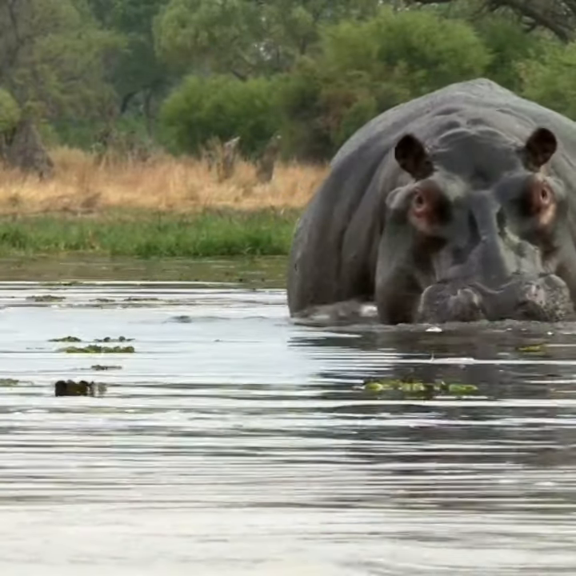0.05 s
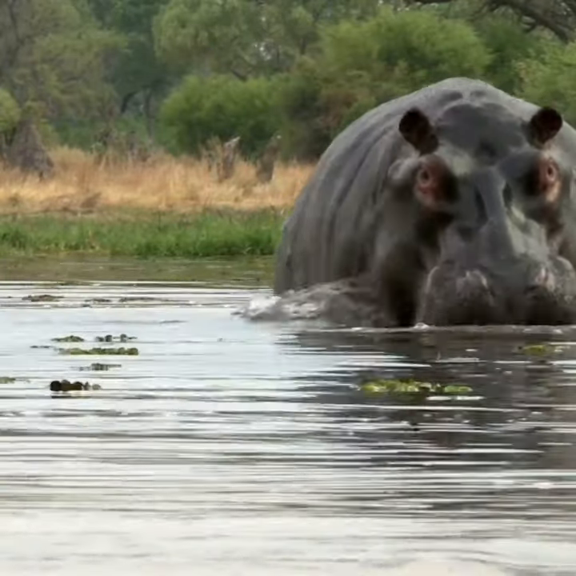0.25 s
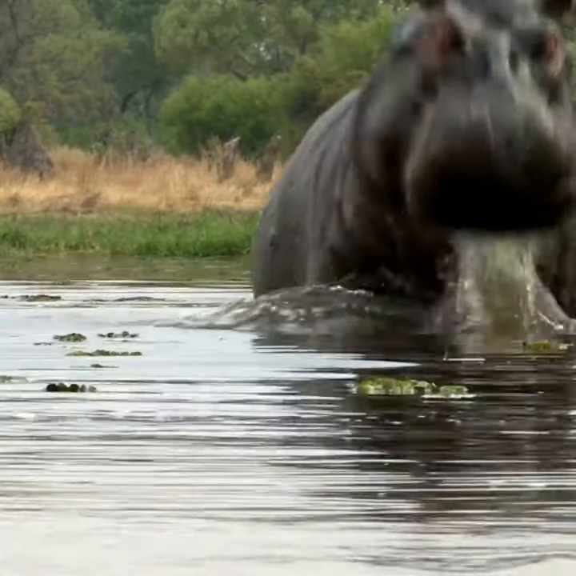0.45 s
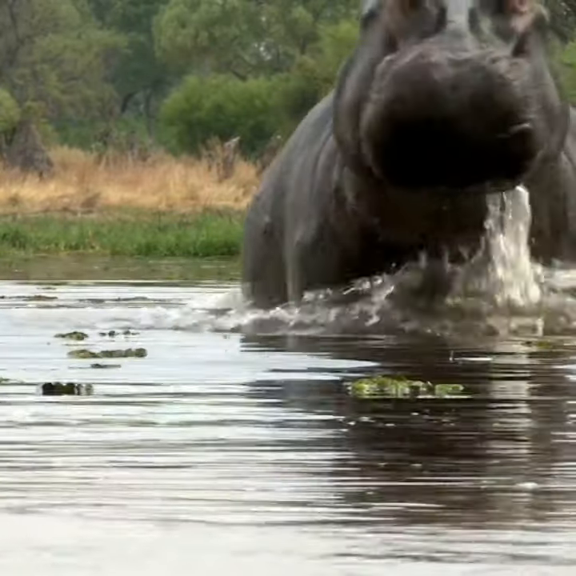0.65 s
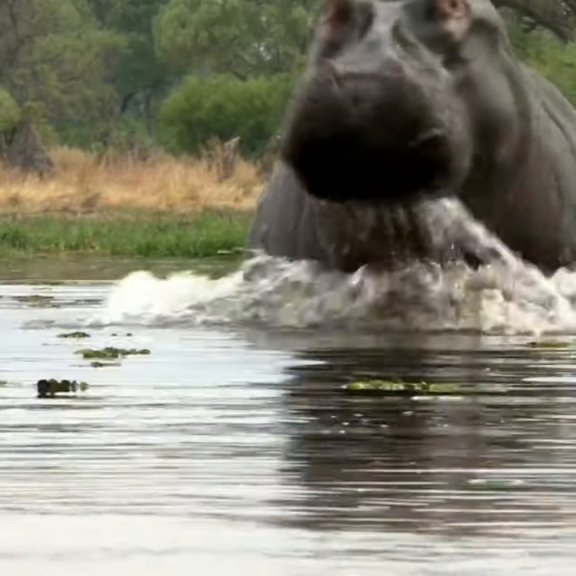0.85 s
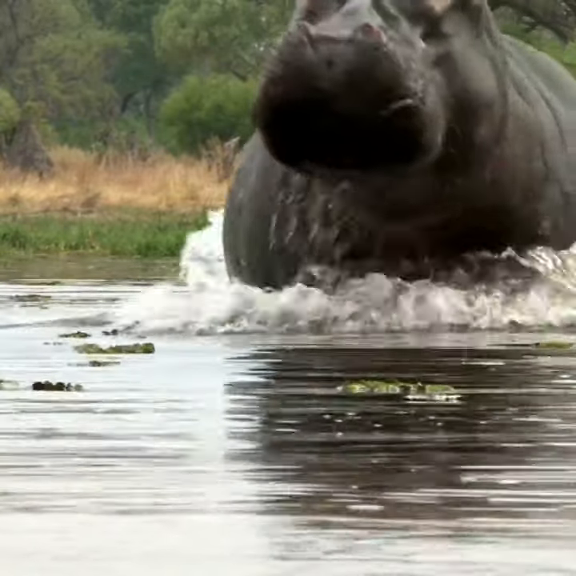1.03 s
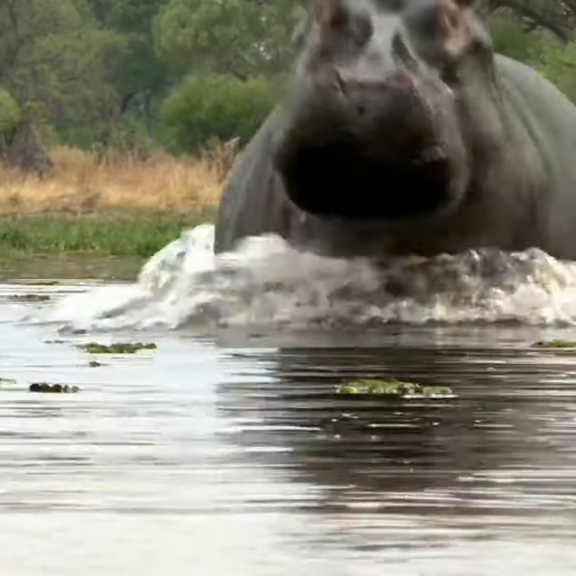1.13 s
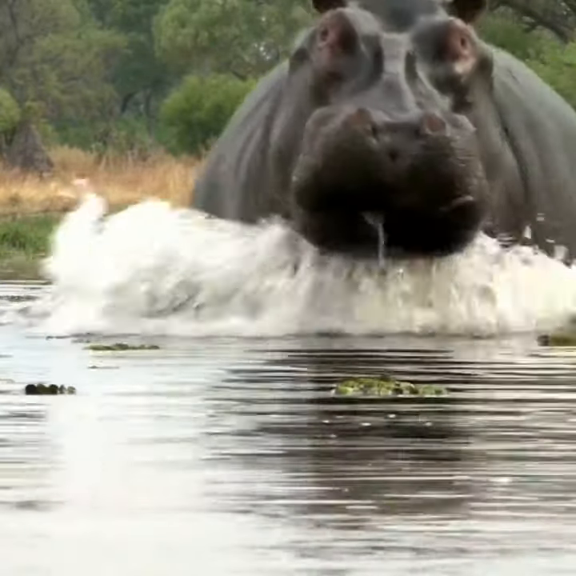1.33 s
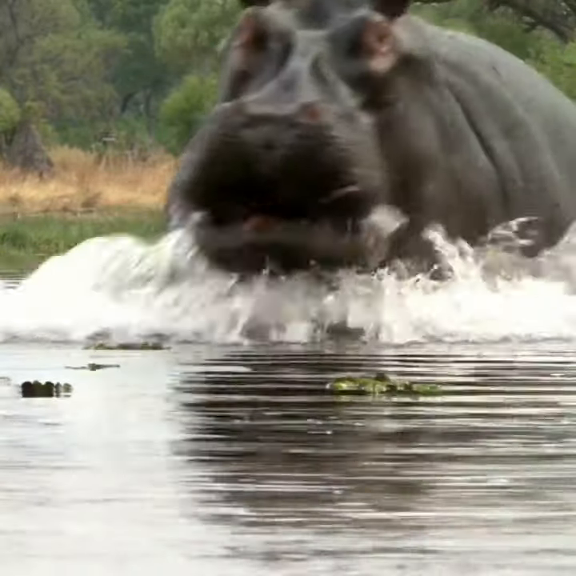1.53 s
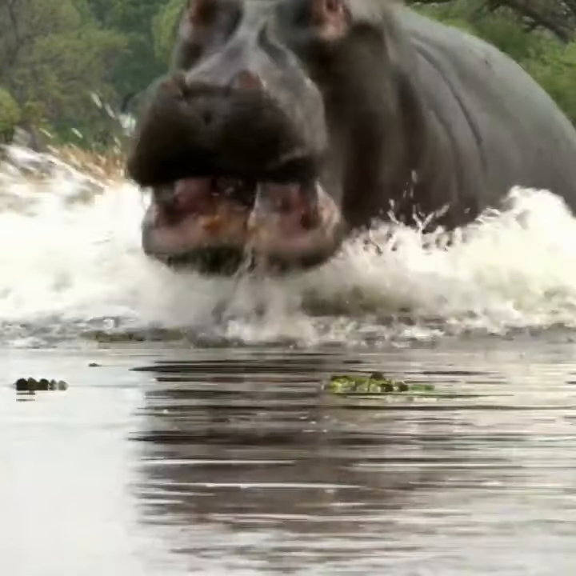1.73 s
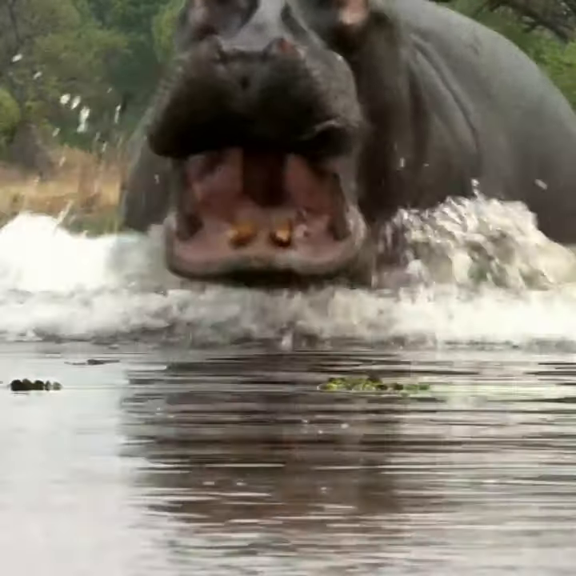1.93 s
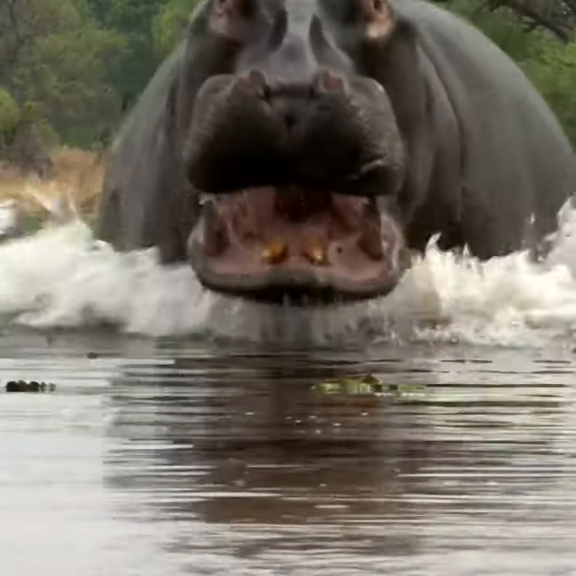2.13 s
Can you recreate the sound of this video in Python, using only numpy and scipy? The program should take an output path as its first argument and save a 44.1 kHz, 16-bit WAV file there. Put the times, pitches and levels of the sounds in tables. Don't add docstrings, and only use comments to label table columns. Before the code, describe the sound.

A hippo gives a short creaky grunt, then a loud rough bellow over churning water

```python
import sys
import numpy as np
from scipy import signal
from scipy.io import wavfile
from scipy.ndimage import uniform_filter1d

SR = 44100
rng = np.random.default_rng(int(sys.argv[2]) if len(sys.argv) > 2 else 0)


def level_to_linear(level):
    exponent = np.asarray(level, float) / 20
    return 10 ** exponent


def wav_record(signal):
    frames = np.transpose(np.atleast_2d(signal))
    bounded = np.clip(frames, -1, 1)
    quanta = np.round(bounded * 32767).astype(np.int16)
    wavfile.write(sys.argv[1], SR, quanta)


N = 96182
T = np.arange(N) / SR


def rms_one(x):
    return x / np.sqrt(np.mean(x ** 2) + 1e-20)


def filtered(x, order, hz, kind="low"):
    return signal.sosfilt(signal.butter(order, hz, kind, fs=SR, output="sos"), x)


def notched(x, hz, width_hz):
    return signal.lfilter(*signal.iirnotch(hz, hz / width_hz, fs=SR), x)


def in_time(rows):
    s, *columns = np.transpose(rows)
    return [np.interp(T, s, c) for c in columns] + [(T >= s[0]) & (T <= s[-1])]


def at_hz(points, hz):
    point_hz, db = np.transpose(points)
    return np.interp(np.log(hz), np.log(point_hz), db)


def drift(rate_hz):
    r = np.exp(-2 * np.pi * rate_hz / SR)
    wander = signal.lfilter([1], [1, -2 * r, r * r], rng.standard_normal(N + 9000))
    return rms_one(wander[9000:])


def coloured(points, patchy_db):
    out, together = 0, drift(9)
    edges = 22 * 2 ** np.arange(0, 9.6, 1 / 3)
    white = rng.standard_normal((2, N))
    for k, (low, high) in enumerate(zip(edges, edges[1:])):
        hz = np.sqrt(low * high)
        if points[0][0] < hz < points[-1][0]:
            flicker_db = patchy_db * (1.5 * together + drift(16))
            out = out + level_to_linear(at_hz(points, hz) + flicker_db) * filtered(white[k % 2], 2, [low, high], "band")
    return rms_one(out)


def noise_layer(rows, colour, patchy_db):
    db, gate = in_time(rows)
    return level_to_linear(db) * coloured(colour, patchy_db) * gate


def throat(x, resonances):
    out = 0
    x = filtered(x + 1e-18, 4, 3750)
    for k, (hz, width_hz, db) in enumerate(resonances):
        r, w = np.exp(-np.pi * width_hz / SR), 2 * np.pi * hz / SR
        sign = (-1) ** (k // 2)
        out = out + sign * level_to_linear(db) * signal.lfilter([np.sin(w)], [1, -2 * r * np.cos(w), r * r], x)
    return out


def pulses(rate, gate):
    return np.diff(np.ceil(np.cumsum(rate * gate) / SR), prepend=0)


def ring(s, hz, db, ring_s):
    t = np.maximum(T - s, 0)
    return level_to_linear(db) * np.exp(-t / ring_s) * np.sin(2 * np.pi * hz * t)


def creak(rows, resonances, sign, breath, spread_db, low_hz, spit_db, edge=1):
    brightens = .6
    rate, db, gate = in_time(rows)
    clicks = pulses(rate, gate) * level_to_linear(db + spread_db * drift(53))
    puffs = signal.lfilter([1], [1, -.994], clicks) * rng.standard_normal(N)
    source = filtered(sign * clicks + breath * puffs, 1, 338, "high")
    bright = source * level_to_linear(brightens * (db + 9))
    voiced = throat(source, resonances[:4]) + edge * throat(bright, resonances[4:])
    spit = filtered((puffs + 3 * clicks) * level_to_linear(brightens * db), 3, [3300, 8200], "band")
    return filtered(voiced, 3, low_hz, "high") + level_to_linear(spit_db) * spit


def tone():
    # t/s, pitch f/Hz, fundamental level/dB, overtones level/dB
    tone_curve = [(1.44, 255, -34, -50), (1.475, 238, -28, -30), (1.5, 247, -23, -21),
                  (1.55, 251, -20.5, -20), (1.585, 250, -19.5, -22), (1.635, 253.3, -17, -22),
                  (1.67, 251, -17, -20), (1.705, 246.5, -18.5, -19.5), (1.73, 251, -19, -25),
                  (1.75, 250, -19.5, -38), (1.8, 247, -20, -40), (1.825, 241, -26, -42),
                  (1.93, 244, -25, -50), (1.975, 262, -55, -60)]
    # f/Hz, level/dB
    overtones = [(500, 9), (750, 9.5), (1000, 6), (1250, 2.5), (1500, -1.5), (1750, -1), (2250, -4.5),
                 (3200, -30), (4500, -26)]
    # t/s, lift/dB
    mouth_lift = [
        (1.5, 13.5),
        (1.55, 9.5),
        (1.6, 2),
        (1.72, -4.5),
    ]
    # t/s, rate f/Hz, side lines level/dB
    second_curve = [(1.565, 100, -48), (1.595, 100, -30), (1.63, 106, -28), (1.655, 127, -28),
                    (1.69, 116, -36), (1.72, 99, -26), (1.757, 96, -26), (1.772, 146, -27),
                    (1.83, 126, -26), (1.86, 143, -32), (1.93, 130, -36)]
    # f/Hz, level/dB
    side_lines = [(400, 2), (650, 9), (900, 12.5), (1150, 14), (1400, 0.5), (1900, 0.5), (2350, -8.5),
                  (3500, -58)]
    hz, low_db, high_db, gate = in_time(tone_curve)
    second_hz, side_db, beating = in_time(second_curve)
    lift_db = in_time(mouth_lift)[0]
    phase = 2 * np.pi * np.cumsum(hz * (1 + .002 * drift(30))) / SR
    second = 2 * np.pi * np.cumsum(second_hz * (1 + .07 * drift(12.3))) / SR
    over = 0
    for k in range(2, 19):
        near_mouth = np.exp(-((k * hz - 1090) / 190) ** 2)
        line_db = high_db + at_hz(overtones, k * hz) + lift_db * near_mouth + .8 * drift(40)
        beside_db = side_db + at_hz(side_lines, k * hz - second_hz) + 4 * drift(33)
        angle = k * phase - .12 * k * k
        over = over + level_to_linear(line_db) * np.cos(angle) + beating * level_to_linear(beside_db) * np.cos(angle - second)
    return gate * (1.2 * level_to_linear(low_db) * np.cos(phase) + 0.32 * over)


def growl():
    # t/s, pulse rate f/Hz, level/dB, depth of slow throb/dB
    growl_curve = [(1.385, 200, -52, 0.3), (1.415, 200, -32, 0.3), (1.44, 210, -25, 3.7),
                   (1.47, 220, -21, 2.5), (1.5, 247, -34, -5), (1.57, 250, -35, -5), (1.61, 250, -25, -5),
                   (1.68, 250, -27, -5), (1.72, 250, -23, -3), (1.78, 245, -18, 0), (1.84, 240, -19, 1),
                   (1.91, 230, -20, 2), (1.945, 173, -19.5, -10), (1.99, 180, -53, -9)]
    # f/Hz, width/Hz, level/dB
    growl_throat = [(436, 195, -11.5), (557, 132, -7), (920, 360, -20.5), (1136, 200, -6),
                    (1847, 317, -6.5), (2316, 63, -20.5), (2817, 380, -12), (4500, 1500, -41.5)]
    rate, db, throb_depth_db, gate = in_time(growl_curve)
    jitter, spread_db = np.exp(.17 * drift(90)), 1.5
    clicks = pulses(rate * jitter, gate) * level_to_linear(spread_db * rng.standard_normal(N))
    puffs = signal.lfilter([1], [1, -.99], clicks) * rng.standard_normal(N)
    source = clicks + 0.165 * puffs
    throb_db = throb_depth_db * (1 + np.cos(2 * np.pi * 53 * (T - 1.916)))
    voiced = throat(source * level_to_linear(throb_db), growl_throat[:2]) - throat(source, growl_throat[2:])
    level = np.sqrt(uniform_filter1d(voiced ** 2, size=2000) + 1e-5)
    return filtered(voiced / level * level_to_linear(db) * gate, 3, 170, "high")


def bellow_start():
    # t/s, pulse rate f/Hz, level/dB
    onset_pulses = [
        (1.376, 135, -29),
        (1.405, 135, -28),
        (1.412, 108, -15),
        (1.433, 105, -13),
        (1.46, 100, -20),
    ]
    # f/Hz, width/Hz, level/dB
    loose_throat = [(172, 24, 0.5), (261, 42, 1.5), (468, 20, -7.5), (700, 310, 4), (1092, 37, -1),
                    (1710, 750, 7), (2410, 97, -16.5)]
    return creak(onset_pulses, loose_throat, sign=.7, breath=.02, spread_db=.8, low_hz=135, spit_db=-24)


def deep_flaps():
    # t/s, pulse rate f/Hz, level/dB
    flap_pulses = [
        (1.855, 49, -7),
        (1.877, 49, -11),
        (1.897, 54, -8),
        (1.915, 60, -9),
        (1.935, 62, -18),
    ]
    # f/Hz, width/Hz, level/dB
    flap_throat = [(440, 60, 0), (570, 80, -4)]
    return creak(flap_pulses, flap_throat, sign=0.98, breath=.02, spread_db=-8.5, low_hz=238, spit_db=-25)


def closing_creak():
    # t/s, pulse rate f/Hz, level/dB
    last_pulses = [
        (1.9222, 120, -18),
        (1.9594, 118, -5),
        (1.98, 111, -8),
        (2.0, 106, -7),
        (2.03, 104, -10),
        (2.05, 98, -7),
        (2.07, 90, -9),
        (2.085, 80, -16),
    ]
    # f/Hz, width/Hz, level/dB
    open_throat = [(111, 34, -5), (270, 66, -5), (606, 67, -13.5), (954, 258, 5), (1500, 150, -8),
                   (1790, 220, -2.5), (2335, 88, -9), (2770, 280, -15)]
    # t/s, low f/Hz, low level/dB, high f/Hz, high level/dB
    jaw_path = [
        (1.93, 500, -15, 1130, -26),
        (1.96, 700, -10.5, 1190, -4.5),
        (1.99, 650, -21, 1090, -53),
        (2.01, 625, -12, 1500, -42),
        (2.045, 576, -10, 1620, -37),
        (2.085, 412, -26, 1630, -27),
    ]
    rate, _, gate = in_time(last_pulses)
    low_hz, low_db, high_hz, high_db, _ = in_time(jaw_path)
    out = creak(last_pulses, open_throat, sign=0.39, breath=.02, spread_db=-1.6, low_hz=79.6, spit_db=-46)
    ring_s = 0.0034
    for i in np.flatnonzero(pulses(rate, gate)):
        out = out + ring(T[i], low_hz[i], low_db[i], ring_s) + ring(T[i], high_hz[i], high_db[i], ring_s / 2)
    return out


def grunt():
    # t/s, pulse rate f/Hz, level/dB
    main_slaps = [
        (.21, 83, -40),
        (.222, 83, -19),
        (.2495, 83, -19),
        (.259, 83, -13.5),
        (.2995, 82, -10),
        (.3195, 70, -10),
        (.3375, 55, -12),
        (.3595, 42, -17),
    ]
    # t/s, pulse rate f/Hz, level/dB
    second_slaps = [
        (.2265, 84, -23),
        (.24, 84, -21),
        (.253, 84, -26),
    ]
    # f/Hz, width/Hz, level/dB
    shut_throat = [(88, 35, 5.5), (218, 37, -1), (618, 28, -5.5), (762, 155, 4.5), (1160, 650, 5),
                   (1640, 580, -17.5), (2450, 110, -15), (3600, 860, -25)]
    return (creak(main_slaps, shut_throat, sign=-0.43, breath=.012, spread_db=-0.25, low_hz=74, spit_db=-28,
                  edge=-1.1)
            + creak(second_slaps, shut_throat, sign=-0.76, breath=.012, spread_db=1, low_hz=62.5, spit_db=-45))


def snort():
    # t/s, level/dB
    snort_curve = [
        (.185, -78),
        (.2, -52),
        (.25, -50),
        (.3, -41),
        (.352, -58),
        (.358, -36),
        (.385, -44),
        (.47, -51),
        (.58, -66),
    ]
    # f/Hz, level/dB
    snort_colour = [(70, -4), (250, 8.5), (700, -2.5), (1500, 3.5), (2600, 0.5), (4500, -26), (6800, -21),
                    (11000, -53)]
    return noise_layer(snort_curve, snort_colour, 2.4)


def spray():
    # t/s, level/dB
    hiss_curve = [(1.365, -85), (1.385, -56), (1.425, -74), (1.46, -43.5), (1.6, -44), (1.8, -40),
                  (1.89, -44), (1.96, -49.5), (2.05, -40.5), (2.1, -51.5), (2.18, -59)]
    # f/Hz, level/dB
    hiss_colour = [(3500, 11.5), (5200, -33), (5900, -5.5), (6500, 6.5), (7300, -4.5), (9000, -41),
                   (12000, -51.5), (13500, -85)]
    # t/s, level/dB
    burst_times = [(1.391, -47), (1.414, -53), (1.4321, -35), (1.445, -32), (1.464, -25), (1.494, -22),
                   (1.5344, -26.5), (1.706, -33), (1.7513, -30), (1.8143, -19.5), (1.8284, -20.5),
                   (1.863, -26), (1.9135, -17), (1.93, -19.5), (2.046, -25)]
    shape = 0
    for s, db in burst_times:
        decay = np.exp(-np.maximum(T - s, 0) / 0.013)
        shape = shape + level_to_linear(db - 13) * (T > s) * decay
    bursts = uniform_filter1d(shape, size=60) * coloured(hiss_colour, 0.46)
    return noise_layer(hiss_curve, hiss_colour, 2) + bursts


def hollow(x):
    # f/Hz, width/Hz
    cavities = [(2140, 200), (2660, 160), (3400, 400)]
    for hz, width_hz in cavities:
        x = .15 * x + .85 * notched(x, hz, width_hz)
    return x


def echo(x):
    t = np.arange(SR) / SR
    fade_s, delay_s = 0.45, 0.0094
    tail = rng.standard_normal(SR) * level_to_linear(-60 * t / fade_s) * np.clip(t / delay_s, 0, 1)
    tail = filtered(tail, 1, [150, 5000], "band")
    return signal.fftconvolve(x, tail / np.sqrt(np.sum(tail ** 2)))[:N]


def splash():
    # t/s, level/dB
    splash_curve = [
        (1.38, -70),
        (1.45, -45),
        (1.9, -39),
        (2.05, -36),
        (2.18, -34.5),
    ]
    # f/Hz, level/dB
    splash_colour = [(35, -36), (60, -3), (825, -8.5), (1590, -5), (1750, -19.5), (2040, -31.5),
                     (2520, -6.5), (4850, -26), (6000, -21), (7800, -22.5), (13200, -120)]
    return noise_layer(splash_curve, splash_colour, 1.5)


def brief_rings():
    # t/s, f/Hz, level/dB
    ring_times = [
        (0.195, 227, -39.5),
        (0.209, 227, -31.5),
        (.385, 620, -50),
        (.396, 560, -50),
        (0.413, 1310, -45),
        (.417, 655, -41),
        (0.444, 1410, -40),
        (2.096, 1240, -30),
        (2.12, 2490, -28.5),
        (2.146, 765, -30),
    ]
    return sum(ring(s, hz, db, 0.0066) for s, hz, db in ring_times)


def gusts():
    # t/s, level/dB, length/s
    gust_times = [
        (1.665, -45.5, 0.042),
        (1.96, -34, 0.03),
    ]
    out = 0
    for s, db, length_s in gust_times:
        out = out + level_to_linear(db) * np.exp(-((T - s) / length_s) ** 2) * np.sin(2 * np.pi * 25.7 * (T - s))
    return out


def surroundings():
    # t/s, level/dB
    air_curve = [
        (0, -53),
        (.17, -61),
        (.6, -58.5),
        (.8, -60),
        (2.18, -58.5),
    ]
    # f/Hz, level/dB
    air_colour = [(20, 1), (130, -2.5), (500, -0.5), (2400, -9.5), (3500, -17), (7500, -50.5), (11000, -31),
                  (13500, -26.5), (15600, -36)]
    return noise_layer(air_curve, air_colour, .8)


def scene():
    voice = tone() + growl() + bellow_start() + deep_flaps() + closing_creak() + grunt()
    voice, hiss = filtered([voice, spray()], 8, 12800)
    call = hollow(voice + level_to_linear(-16.5) * echo(voice) + snort())
    hiss = notched(hiss, 5580, 500)
    return (call + hiss + splash() + brief_rings() + gusts() + surroundings())[None]


def roll_off(x):
    return signal.sosfilt(signal.butter(12, 15610, fs=SR, output="sos"), x)


def record(dry):
    top_cut = signal.cheby2(12, 70, 16200, fs=SR, output="sos")
    mix = signal.sosfilt(top_cut, dry)
    return roll_off(mix)


dry = scene()
out = record(dry)
wav_record(out)
```